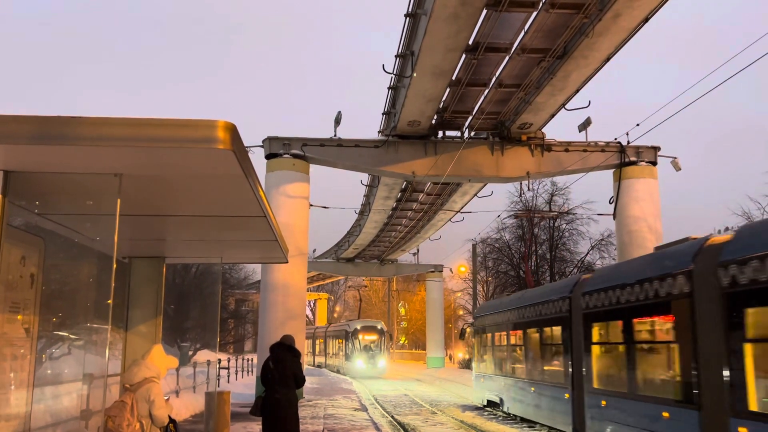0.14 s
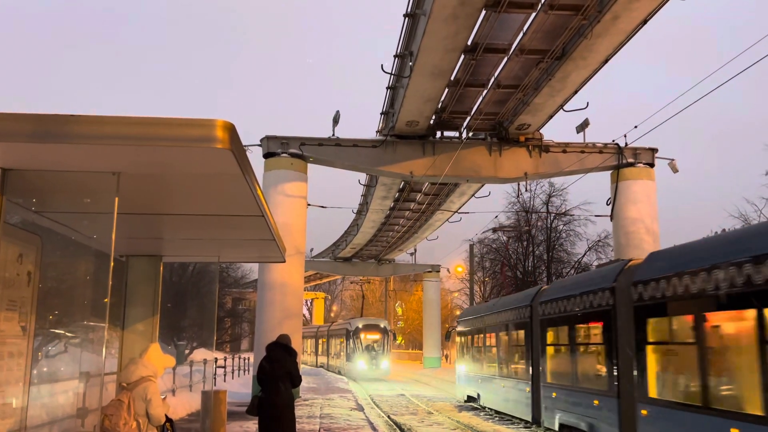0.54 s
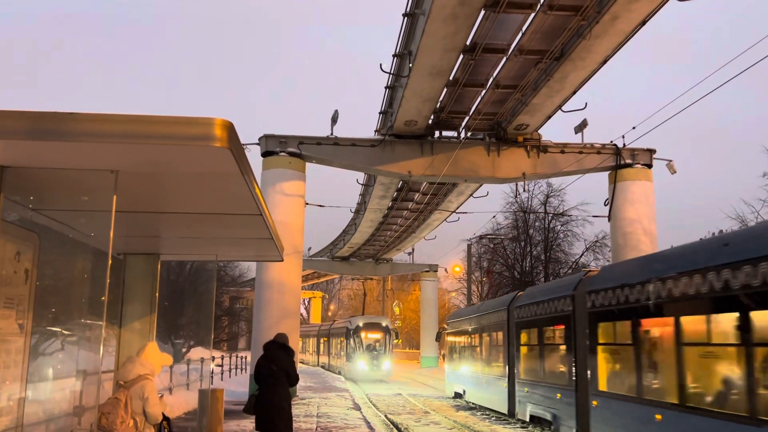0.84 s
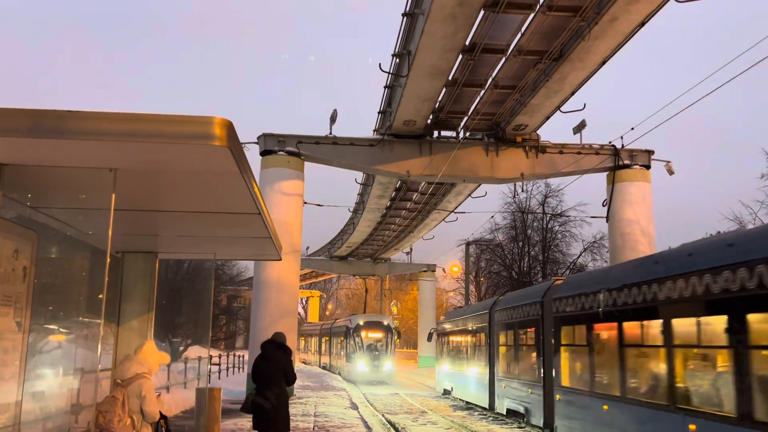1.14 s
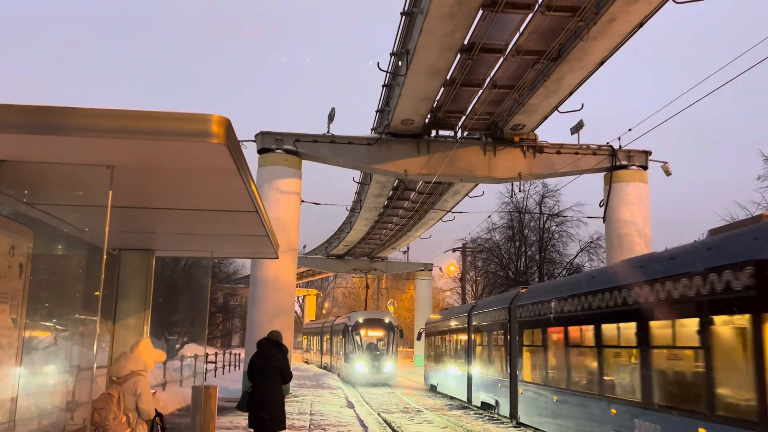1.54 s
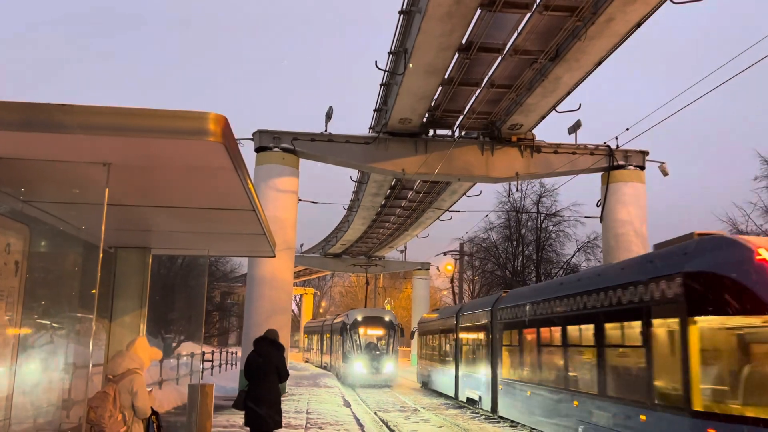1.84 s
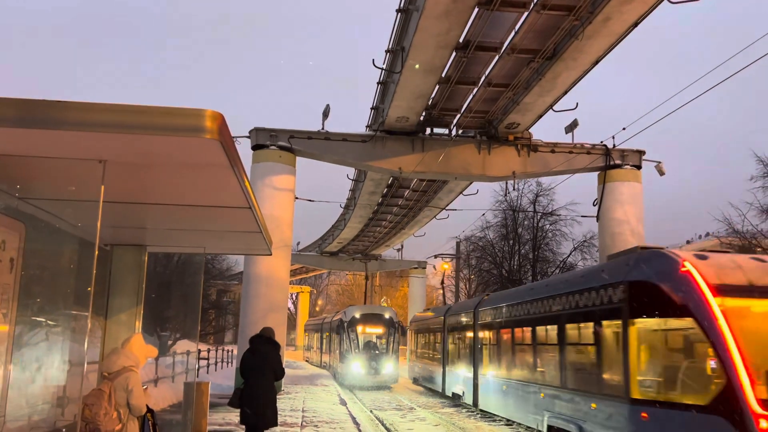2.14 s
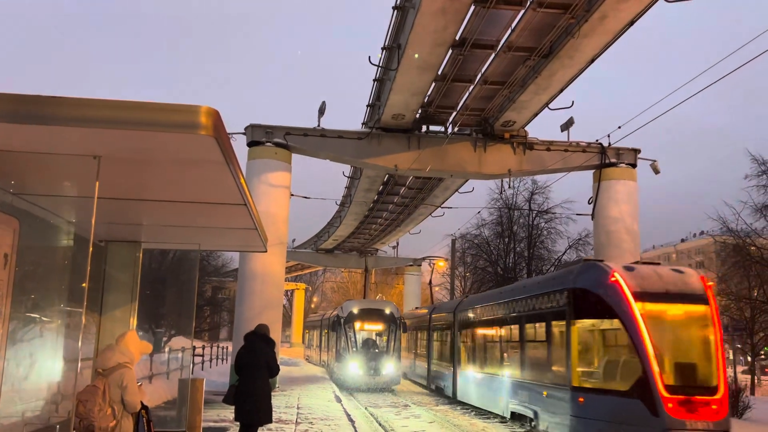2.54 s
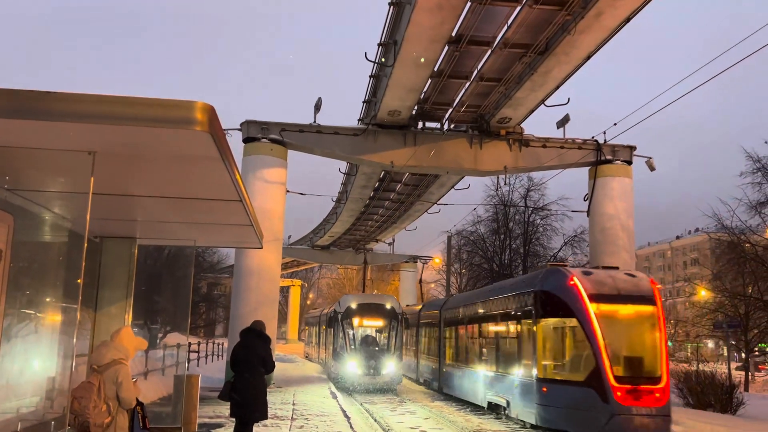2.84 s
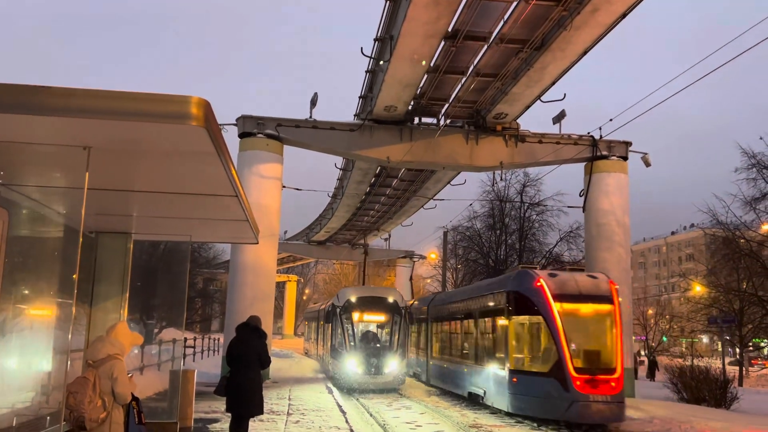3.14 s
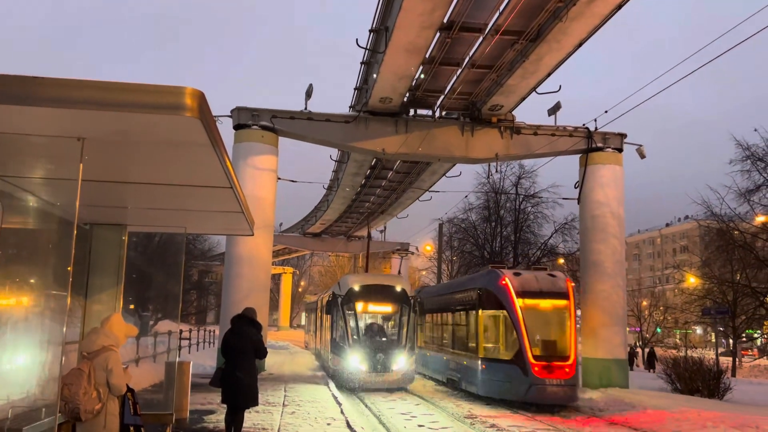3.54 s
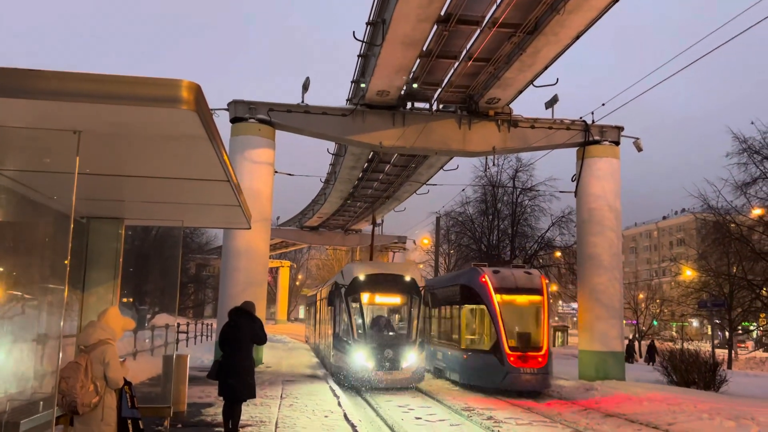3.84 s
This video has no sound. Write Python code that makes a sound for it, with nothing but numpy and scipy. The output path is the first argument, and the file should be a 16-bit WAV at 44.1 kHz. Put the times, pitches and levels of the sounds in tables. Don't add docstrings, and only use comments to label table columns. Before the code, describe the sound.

Departing tram rumbles past, thudding across rail joints, its motors whining high before fading into hiss.

```python
import sys
import numpy as np
from scipy import signal
from scipy.fft import rfft, irfft, next_fast_len
from scipy.io import wavfile
from scipy.ndimage import uniform_filter1d, map_coordinates

SR = 44100
rng = np.random.default_rng(int(sys.argv[2]) if len(sys.argv) > 2 else 0)


def how_loud(loudness_db):
    steps = np.asarray(loudness_db, float) / 20
    return 10 ** steps


def to_wav(s):
    ch = np.atleast_2d(s).T
    pcm = np.round(np.clip(ch, -1, 1) * 32767)
    wavfile.write(sys.argv[1], SR, pcm.astype(np.int16))


N = 176400

# time in seconds, rumble level in dB, wheel roll level in dB.
ROLLING = [(0.0, -20.5, -37), (0.21, -23, -37.5), (0.83, -25, -38.5), (1.0, -30, -44.5), (1.58, -30, -42),
           (1.98, -31.5, -44), (2.44, -33, -45), (2.54, -30.5, -45), (2.86, -33.5, -44.5),
           (3.29, -34.5, -44.5), (3.6, -33, -43.5), (4.0, -30, -43)]
# frequency in Hz, density in dB.
RUMBLE_COLOUR = [(12, -41), (20, -19), (48, 6.5), (70, 0.5), (159, -6.5), (300, -22), (390, -48),
                 (660, -120)]
# frequency in Hz, density in dB.
ROLL_COLOUR = [(120, -10), (200, -3), (328, -9.5), (426, -12), (524, -10), (796, -16), (1180, -19),
               (2090, -29), (4500, -37.5), (9900, -120)]
# frequency in Hz, density in dB.
HISS_COLOUR = [(1500, -2), (2500, -0.5), (4500, -2), (5450, -5), (6300, -9.5), (7800, -11), (9500, -17.5),
               (12000, -19), (15800, -20.5)]
# frequency in Hz, width in Hz, level in dB.
BODY = [(55.7, 14, 8), (72.5, 17, 0.5), (104.3, 12, -6.5)]
# frequency in Hz, width in Hz, level in dB.
GEARS = [(2300, 600, -9.5), (2510, 700, -10.5), (3440, 2400, -7.5), (1520, 720, -5)]
# frequency in Hz, width in Hz, level in dB.
WHEEL_WEBS = [(570, 72, -6), (673, 60, -5), (890, 84, -18.5)]
# start in seconds, peak level in dB, frequency in Hz.
BOOMS = [(0.02, -16, 77.3), (0.079, -12.5, 74.6), (0.134, -9.5, 64), (0.189, -15.5, 73.7),
         (0.248, -19, 64.6), (0.379, -20, 61.2), (0.419, -16, 61), (0.517, -17.5, 86.5), (0.619, -15, 55.7),
         (0.654, -17.5, 68), (0.763, -15, 65.6), (0.809, -21, 70.5), (0.935, -4, 69.7), (1.012, -9.5, 63),
         (1.156, -18.5, 59), (1.244, -13.5, 94.2), (1.278, -11, 78.1), (1.36, -26, 53.8),
         (1.406, -23.5, 66), (1.566, -14.5, 59.5), (1.619, -20, 68.4), (1.774, -23, 64.8),
         (1.838, -20.5, 62.5), (1.892, -16, 57), (2.021, -18.5, 62.7), (2.058, -21.5, 59.6),
         (2.117, -25.5, 57), (2.322, -22.5, 55.4), (2.408, -24, 61.9), (2.622, -16, 56.5), (2.729, -27, 60),
         (3.008, -25, 93), (3.04, -23.5, 53.8), (3.111, -24, 59.2), (3.189, -21.5, 80), (3.249, -27.5, 95),
         (3.284, -20, 62.7), (3.369, -24, 50), (3.516, -23.5, 89), (3.569, -21, 68.7), (3.726, -21.5, 73),
         (3.829, -16.5, 66.7), (3.859, -18, 57)]
# time in seconds, thump level in dB, thump pitch in Hz, clack over thump in dB.
JOINTS = [(0.07, -26, 137, -16), (0.164, -7.5, 150, -27.5), (0.426, -18, 143, -22),
          (0.921, -10.5, 128, -17.5), (0.945, -14.5, 150, -20.5), (1.02, -21, 147, -21.5),
          (1.164, -23, 155, -44), (1.242, -11, 138, -22), (1.266, -7, 153.4, -29.5), (1.412, -12, 131, -25),
          (1.747, -9, 154.4, -25), (2.027, -17.5, 152, -24.5), (2.064, -23, 151, -25),
          (2.374, -25, 157, -18.5), (2.632, -17.5, 171.5, -23.5), (2.649, -14.5, 131.3, -29.5),
          (2.994, -9, 160.4, -27), (3.153, -16, 149, -19), (3.179, -19.5, 166, -27),
          (3.516, -11.5, 150.3, -24.5), (3.716, -20.5, 174.6, -15.5), (3.736, -19, 164.4, -18.5),
          (3.812, -20.5, 140, -26)]
# multiple of the thump pitch, level in dB, 60 dB decay in seconds.
THUMP_MODES = [(1.011, 6.5, 0.078), (1.229, -2, 0.083), (1.739, -12.5, 0.047)]
# frequency in Hz, density in dB.
CLACK_COLOUR = [(200, 8), (400, 1.5), (700, -4), (1100, -4.5), (2000, -15.5), (3500, -18), (6000, -31),
                (15000, -30)]
# frequency in Hz, 60 dB decay in seconds.
CLACK_T60 = [(300, 0.18), (1500, 0.12), (4000, 0.098), (12000, 0.044)]
# start in seconds, peak level in dB, ring frequency in Hz.
RAIL_TICKS = [(0.078, -38, 12500), (0.92, -29, 3600), (0.92, -41, 12500), (0.921, -24, 1150),
              (1.239, -26, 3400), (1.24, -30, 1300), (1.267, -39, 6240), (1.336, -48, 12900),
              (1.413, -35, 1900), (2.385, -38, 1300), (2.632, -32, 3170), (2.632, -31, 1150),
              (2.633, -40, 12000), (2.994, -38, 4500), (3.155, -33, 1100), (3.157, -36, 3250),
              (3.185, -26, 380), (3.5, -41, 4000), (3.53, -37, 2500), (3.732, -25, 350), (3.735, -38, 3000)]
# time in seconds, rear bogie level in dB, front bogie level in dB.
INVERTER_LOAD = [(0, -83, -85), (.2, -71, -80), (.27, -56, -62), (.5, -58, -56), (.8, -59, -55),
                 (1.1, -57, -58), (1.33, -59, -75), (1.45, -53, -80), (1.7, -55, -85), (1.8, -60, -85),
                 (1.95, -56, -85), (2.25, -56, -81), (2.55, -63, -85), (2.72, -71, -92), (2.8, -88, -90),
                 (4, -89, -86)]
# multiple of the carrier, motor sideband number, level in dB.
WHINE_LINES = [(2, -1, -4), (2, 0, -5), (2, 1, -2), (2, 2, -14), (1, 1, -15), (1, 2, -15), (3, -1, -16),
               (3, 0, -19)]
# start in seconds, length in seconds, level in dB.
SQUEALS = [
    (1.983, 0.061, -76),
    (2.083, .05, -77),
    (2.197, 0.14, -78),
    (2.6, 0.014, -77),
    (3.523, 0.15, -72),
    (3.848, .03, -71.5),
    (3.973, .05, -73),
]
# frequency in Hz, correlation from 0 to 1.
LIKENESS = [(60, .985), (250, .92), (550, .62), (1500, .55), (1800, .9), (3500, .64), (5600, .48),
            (6600, .94)]
# frequency in Hz, left ahead of right in radians.
PORT_LEAD = [(60, -.1), (250, -.3), (700, -1.6), (1650, -2.4), (1780, 0), (3500, .55), (5800, -1.2),
             (6500, 0)]
# frequency in Hz, left over right in dB.
PORT_LEAN = [(250, .2), (700, -2.8), (1600, -2.2), (1800, 1.5), (3000, 2.6), (6200, 2.3), (6600, .2)]


def unit(x):
    return x / np.sqrt(np.mean(x ** 2) + 1e-20)


def along(points, hz):
    f, v = np.transpose(points)
    return np.interp(np.log(hz + 1), np.log(f + 1), v)


def curves(rows):
    s, *cols = np.transpose(rows)
    return [np.interp(np.arange(N) / SR, s, c) for c in cols]


def wobble(rate):
    knots = rng.standard_normal(int(N * rate / SR) + 4)
    return map_coordinates(knots, [np.arange(N) * rate / SR])


def filtered(x, response):
    m = next_fast_len(N + SR // 2)
    return irfft(rfft(x, m) * response(np.fft.rfftfreq(m, 1 / SR)), m)[..., :N]


def resonances(peaks):
    return lambda f: sum(how_loud(db) * np.abs(f * w / (c * c - f * f + 1j * f * w)) ** 2 for c, w, db in peaks)


def rush(colour, patchy_db):
    z = signal.stft(rng.standard_normal((2, N)), nperseg=512)[2]
    patches = uniform_filter1d(rng.standard_normal(z.shape[1:]), 6, 0)
    patches = unit(uniform_filter1d(patches, 10, 1))
    pair = signal.istft(z * how_loud(patchy_db * patches), nperseg=512)[1][:, :N]

    def mid_side(hz):
        turn = np.arccos(np.clip(along(LIKENESS, hz), -1, 1)) / 2
        return colour(hz) * [np.cos(turn), np.sin(turn)]

    mid, side = filtered(pair, mid_side)
    return unit(np.array([mid + side, mid - side]))


def dying(colour, t60, size, channels=1):
    hz, t, z = signal.stft(rng.standard_normal((channels, size)), SR, nperseg=128)
    level_db = along(colour, hz) - 60 * t[:, None] / along(t60, hz)
    return signal.istft(z * how_loud(level_db.T), SR, nperseg=128)[1][:, :size]


def add(track, s, x):
    start = round(s * SR)
    track[..., start:start + x.shape[-1]] += x


def gear_noise(t, pass_s, width_s):
    drift_s, out = 0.22, 0
    for late, (hz, width_hz, db) in zip([-1, 1, 0, 0], GEARS):
        swell = np.exp(-((t - pass_s - late * drift_s) / width_s) ** 2)
        out = out + swell * how_loud(db) * rush(resonances([(hz, width_hz, 0)]), patchy_db=0.7)
    return how_loud(-42.5) * out


def rolling():
    t = np.arange(N) / SR
    pass_s, pass_width_s = 1.1, 0.32
    near_s, near_db_per_s = 2.5, 3.5
    rumble_db, roll_db = curves(ROLLING)
    shared_db = 1.17 * wobble(3.17)

    rumble = rush(lambda f: how_loud(along(RUMBLE_COLOUR, f)), patchy_db=0.6)
    rumble = rumble + how_loud(3) * rush(resonances(BODY), patchy_db=1.1)
    roll = rush(lambda f: how_loud(along(ROLL_COLOUR, f)), patchy_db=1.04)
    hiss = rush(lambda f: how_loud(along(HISS_COLOUR, f)) * f ** 2 / (f ** 2 + 1500 ** 2), patchy_db=2.26)
    webs = rush(resonances(WHEEL_WEBS), patchy_db=.7)

    mean_db = roll_db.mean()
    hiss_db = mean_db - 12 + 0.73 * (roll_db - mean_db)
    hiss_db = hiss_db + 5 * np.exp(-((t - pass_s) / pass_width_s) ** 2)
    hiss_db = hiss_db + near_db_per_s * np.maximum(t - near_s, 0)
    out = how_loud(rumble_db + 0.5 + shared_db + 0.85 * wobble(7.66)) * rumble
    out = out + how_loud(roll_db + 3.5 + shared_db + 1.1 * wobble(12)) * roll
    out = out + how_loud(hiss_db + 0.18 * wobble(20)) * hiss
    out = out + how_loud(-40.5 - 6.5 * t) * webs
    return out + gear_noise(t, pass_s, pass_width_s)


def compressor():
    per_s, first_s, valve_hz, t60_s, level_db = 24, .015, 6150, .04, -59
    out, t = np.zeros((2, N + SR)), np.arange(SR // 20) / SR
    rise = 1 - np.exp(-t / 0.0023)
    for s in np.arange(first_s, N / SR, 1 / per_s):
        tones_hz = valve_hz * rng.uniform(.965, 1.035, size=4)
        cluster = np.sin(2 * np.pi * np.outer(tones_hz, t)).sum(axis=0)
        fall = how_loud(level_db + rng.normal(0, 2.0) - 60 * t / t60_s)
        add(out, s + rng.uniform(0, 0.0035), fall * cluster * rise)
    return out[:, :N]


def booms():
    out, t = np.zeros(N + SR), np.arange(SR // 4) / SR
    u = t / .018
    swell = u ** 2 * np.exp(2 - 2 * u)
    for s, db, hz in BOOMS:
        add(out, s, how_loud(db + 1.5) * swell * np.sin(2 * np.pi * hz * t))
    return out[:N]


def thump(t, pitch_hz):
    out = 0
    for share, db, t60_s in THUMP_MODES:
        fall = how_loud(db + rng.normal(0, 1.58) - 60 * t / t60_s)
        out = out + fall * np.sin(2 * np.pi * share * pitch_hz * t)
    return out * (1 - np.exp(-(t / 0.0068) ** 2))


def clack(t):
    varied_db = rng.normal(0, 3.5, size=len(CLACK_COLOUR))
    colour = CLACK_COLOUR + np.outer(varied_db, [0, 1])
    noise = dying(colour, CLACK_T60, size=len(t))[0] * (1 - np.exp(-t / 0.013))
    return noise / np.sqrt(np.mean(noise[:SR // 30] ** 2))


def rail_tick(t, hz):
    t60_s, broad_db = .04, -30
    noise = rng.standard_normal(len(t))
    ring = signal.lfilter(*signal.iirpeak(hz, 1.2, SR), noise)
    ring = unit(signal.lfilter(*signal.iirpeak(hz, 1.6, SR), ring))
    tick = ring + how_loud(broad_db) * np.diff(noise, prepend=0)
    return how_loud(-5.5 - 60 * t / t60_s * np.sqrt(hz / 3000)) * tick


def joints():
    out, t = np.zeros(N + SR), np.arange(SR // 3) / SR
    for s, db, pitch_hz, clack_db in JOINTS:
        add(out, s - .002, how_loud(db + 2.2) * (thump(t, pitch_hz) + how_loud(clack_db) * clack(t)))
    for s, db, hz in RAIL_TICKS:
        add(out, s, how_loud(db) * rail_tick(t, hz))
    return out[:N]


def street(x):
    slap_s, slap_db, tail_db, t60_s = .022, -12, -13, 0.57
    colour = [(100, -30.0), (400, -5.5), (1500, 2.5), (5500, -1.5), (7000, -3)]
    tail = dying(colour, [(100, t60_s), (9000, t60_s * 0.6)], size=SR // 2, channels=2)
    wet = signal.fftconvolve(x[None], tail / np.linalg.norm(tail[0]), axes=1)[:, :N]
    slap = np.pad(x, (round(slap_s * SR), 0))[:N]
    return x + how_loud(slap_db) * slap + how_loud(tail_db) * wet


def inverter(load_db, offset_hz, wider_hz):
    carrier_hz, side_hz, recede_hz_per_s = 2466.5, 77, 1.5
    t = np.arange(N) / SR
    shaft = np.cumsum(side_hz + wider_hz) / SR
    turns = np.cumsum(carrier_hz + offset_hz - recede_hz_per_s * np.maximum(t - 1.5, 0)) / SR
    port_db = 2.1 * np.array([wobble(0.57), wobble(3.2)])
    lines = 0
    for k, j, db in WHINE_LINES:
        phase = 2 * np.pi * (k * turns + j * shaft) + 0.81 * wobble(22)
        lines = lines + how_loud(db + 2.2 * wobble(13.33)) * np.sin(phase)
    bands = [(2 * carrier_hz, 260, 0), (3 * carrier_hz, 260, -10)]
    fuzz = rush(resonances(bands), patchy_db=4.5)
    return how_loud(load_db - .5 + port_db) * lines + how_loud(load_db - 9) * fuzz


def whine():
    early = np.clip(1.1 - np.arange(N) / SR, 0, 1)
    rear_db, front_db = curves(INVERTER_LOAD)
    return inverter(rear_db, -7 * early, 9 * early) + inverter(front_db, 11 + 0 * early, 9 + 0 * early)


def brake_squeal():
    squeal_hz, out = 11260, np.zeros((2, N + SR))
    for s, length, db in SQUEALS:
        u = np.arange(round(length * SR)) / SR
        tone = np.sin(2 * np.pi * squeal_hz * u + 1.5 * wobble(70)[:len(u)])
        add(out, s, how_loud(db + 9.5 + 3.3 * wobble(45)[:len(u)]) * np.sin(np.pi * u / length) * tone)
    return out[:, :N]


def scene():
    return rolling() + compressor() + booms() + street(joints()) + whine() + brake_squeal()


def ports(dry, low_share):
    split_hz, lag_s, lag_from_hz, cut_hz, top_hz = 1750, 8 / 44100, 7000, 50, 15780
    side = np.array([[.5], [-.5]])

    def response(hz):
        lead = along(PORT_LEAD, hz) * np.where(hz < split_hz, low_share, 1)
        lead = lead - 2 * np.pi * lag_s * np.maximum(hz - lag_from_hz, 0)
        bass_cut = hz ** 2 / (hz + cut_hz / 1j) ** 2
        return how_loud(side * along(PORT_LEAN, hz)) * np.exp(1j * side * lead) * bass_cut * (hz < top_hz)

    return filtered(dry, response)


def top_cut(x):
    return signal.sosfilt(signal.butter(12, 15780, fs=SR, output="sos"), x)


def record(dry):
    gone = np.clip(np.arange(N) / SR - 1.7 + .5, 0, 1)
    mix = (1 - gone) * ports(dry, low_share=0.76) + gone * ports(dry, low_share=.35)
    return top_cut(mix)


dry = scene()
out = record(dry)
to_wav(out)
```